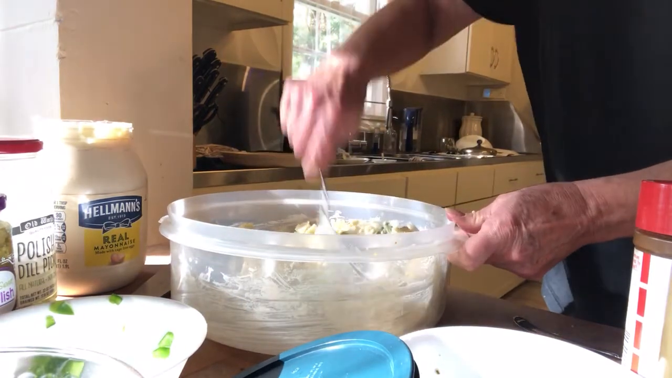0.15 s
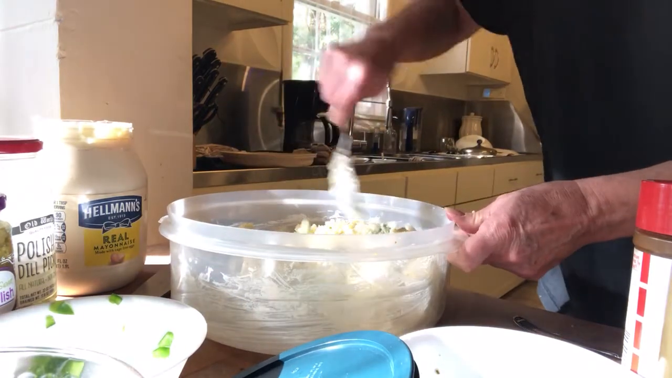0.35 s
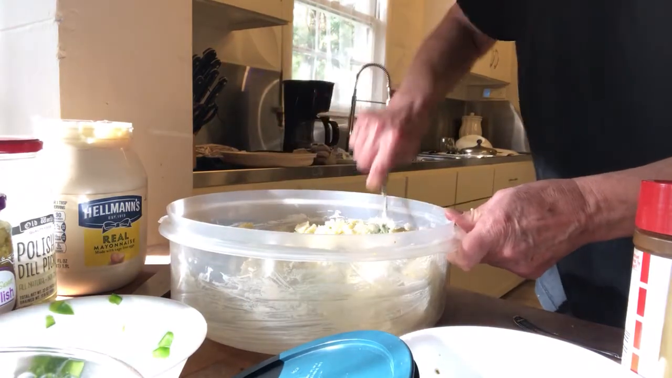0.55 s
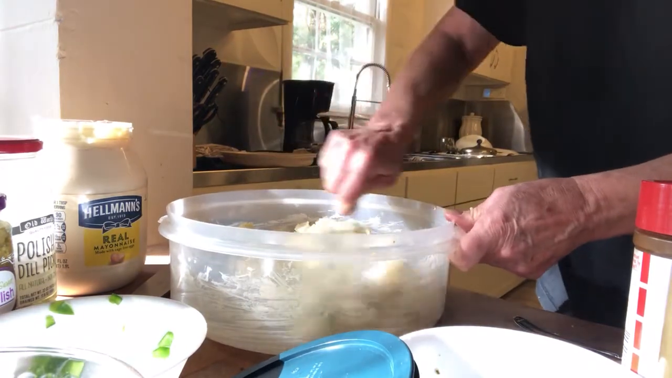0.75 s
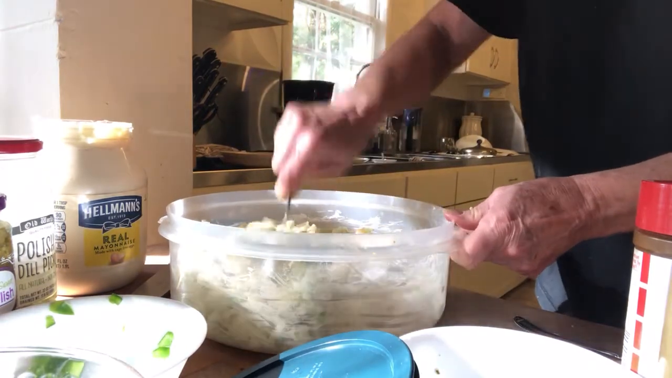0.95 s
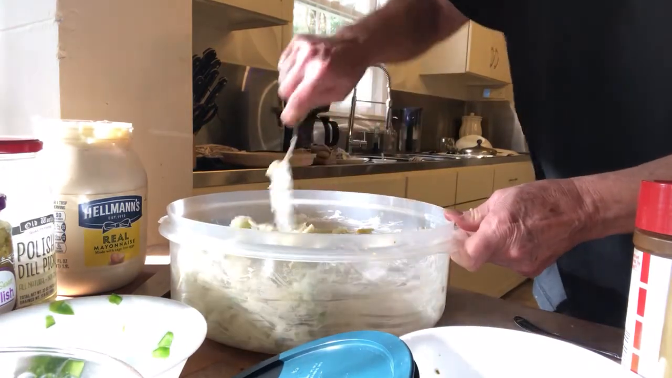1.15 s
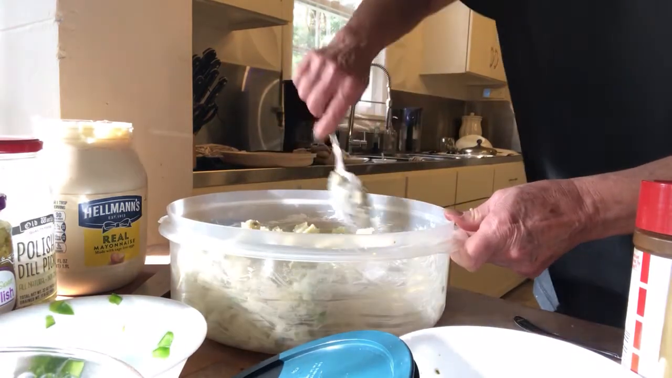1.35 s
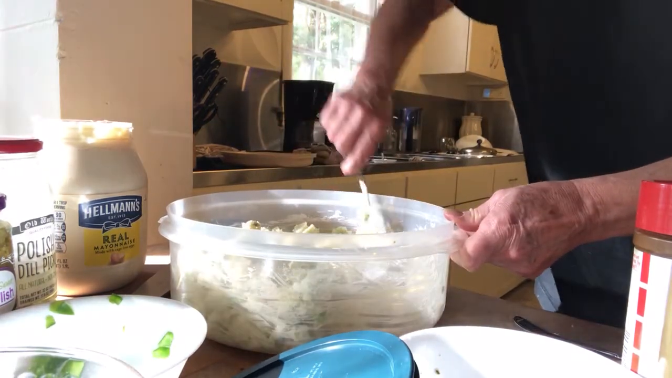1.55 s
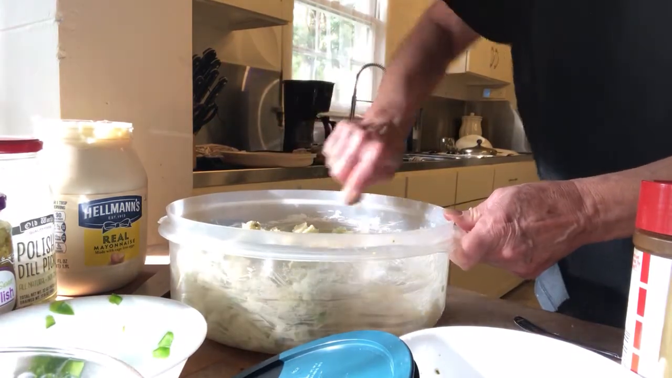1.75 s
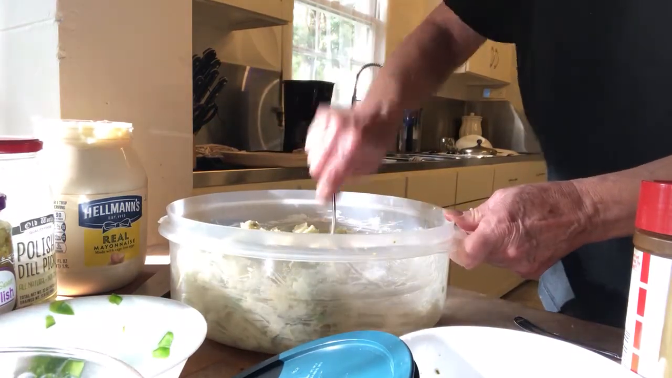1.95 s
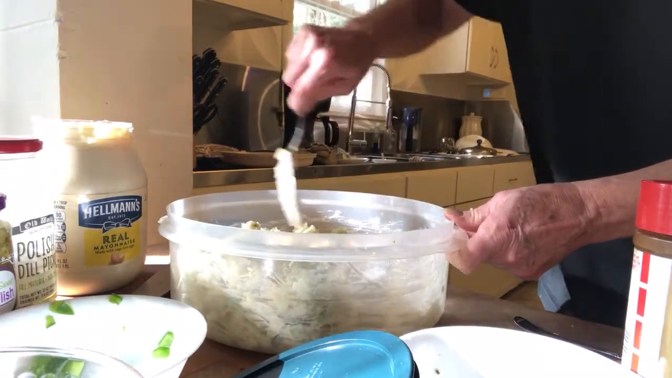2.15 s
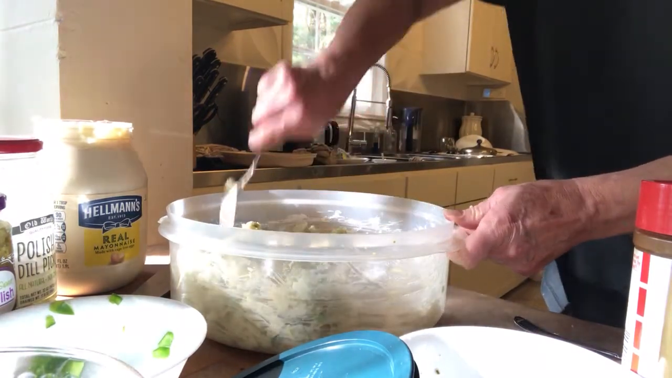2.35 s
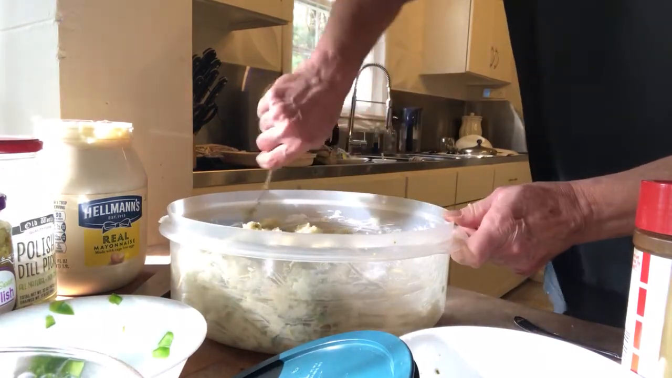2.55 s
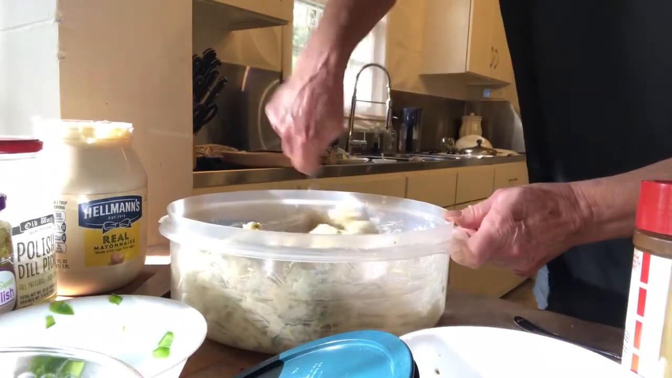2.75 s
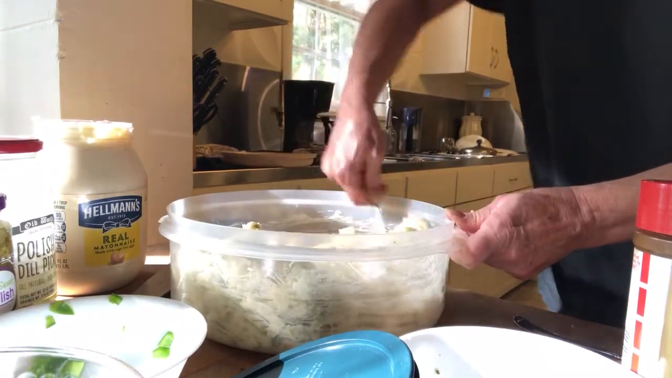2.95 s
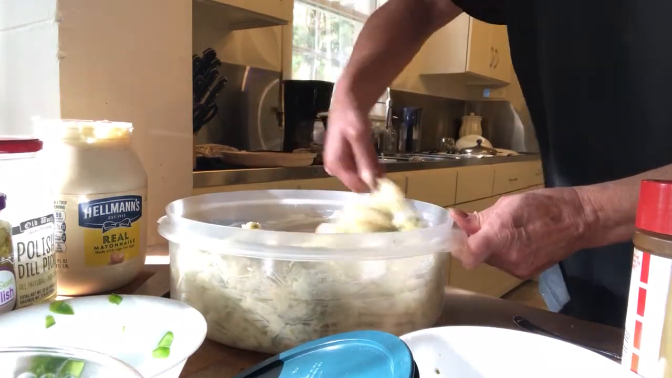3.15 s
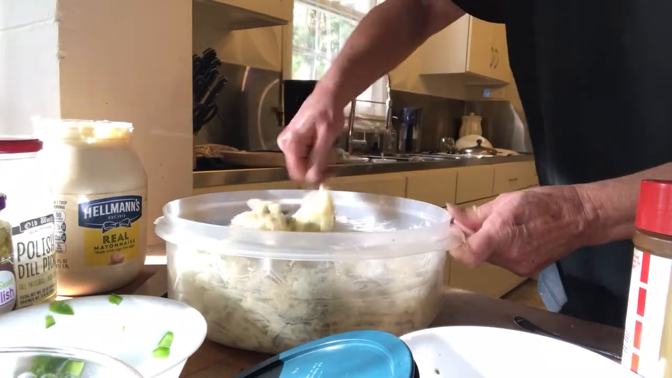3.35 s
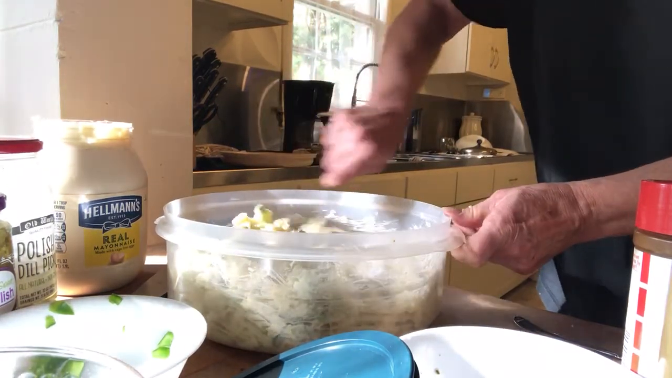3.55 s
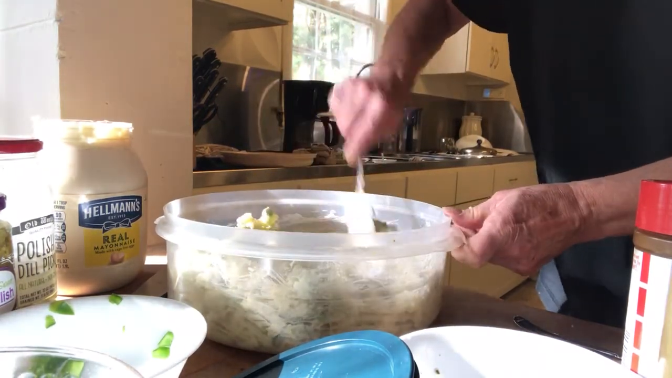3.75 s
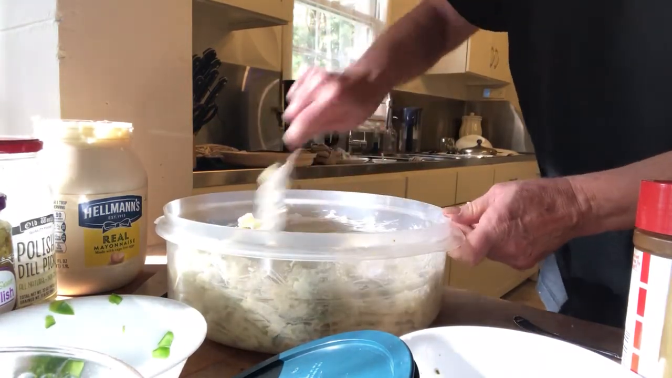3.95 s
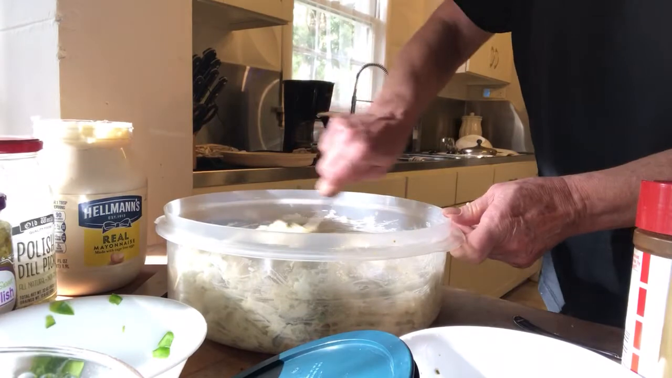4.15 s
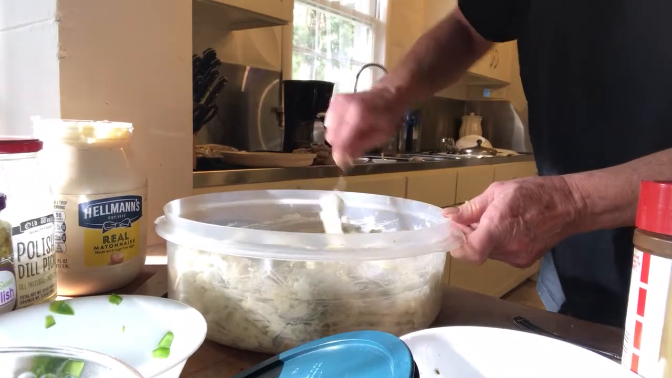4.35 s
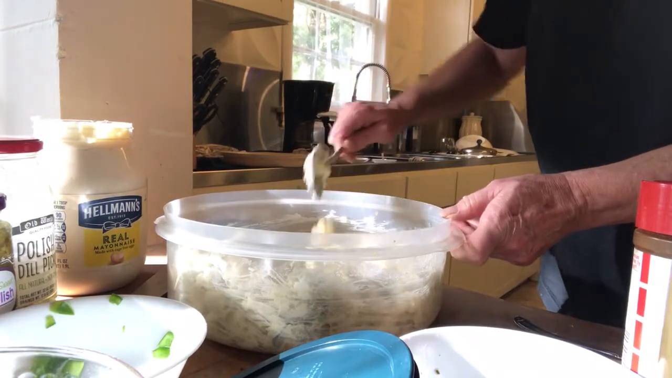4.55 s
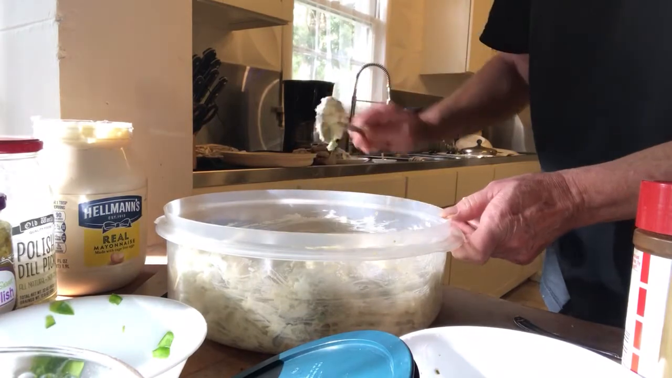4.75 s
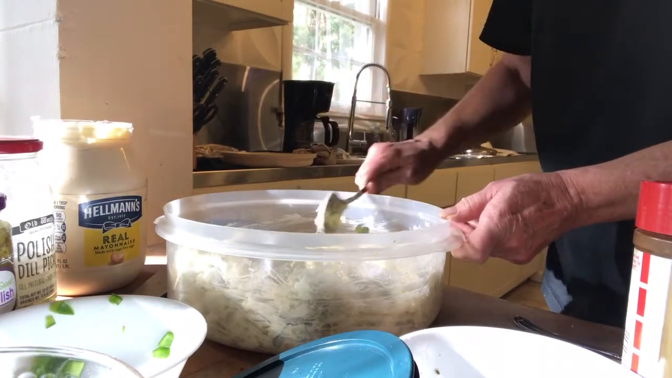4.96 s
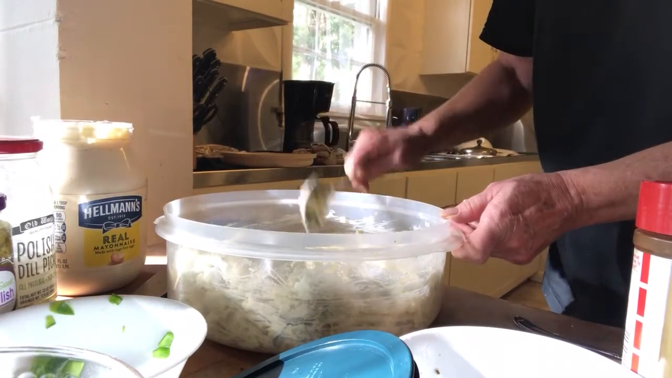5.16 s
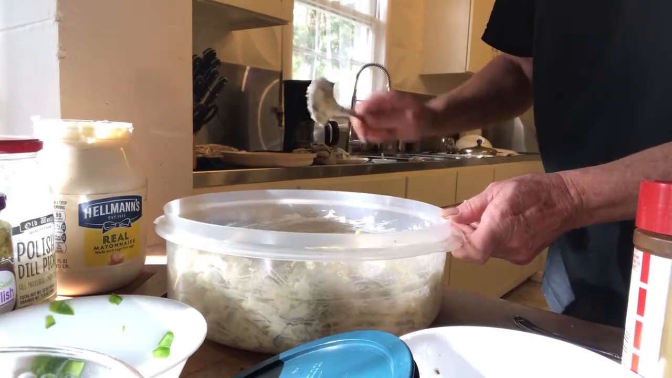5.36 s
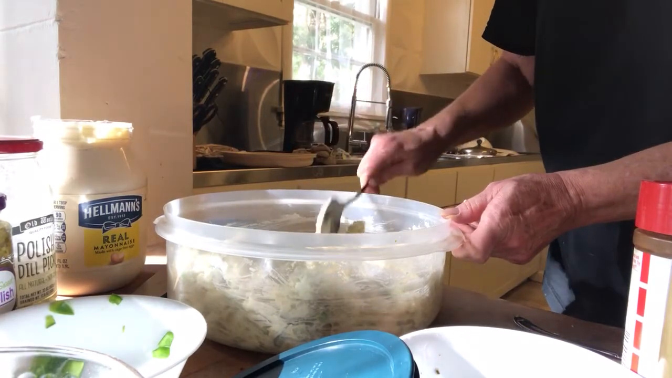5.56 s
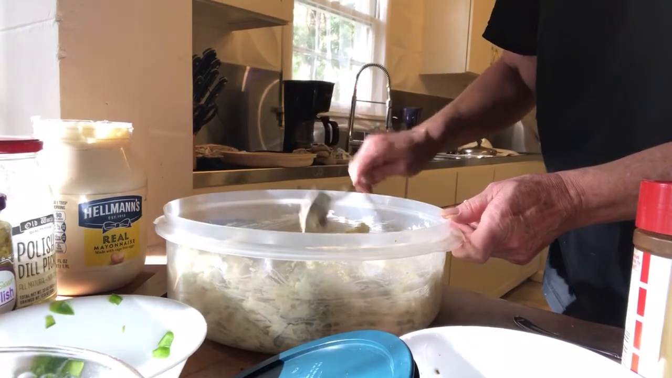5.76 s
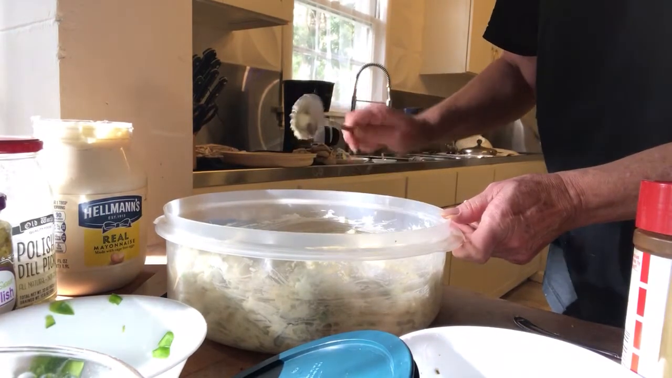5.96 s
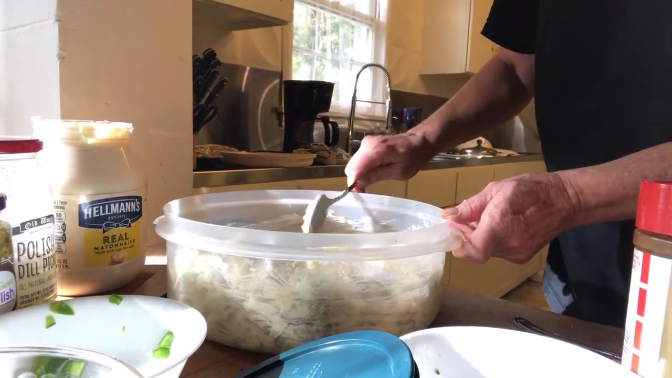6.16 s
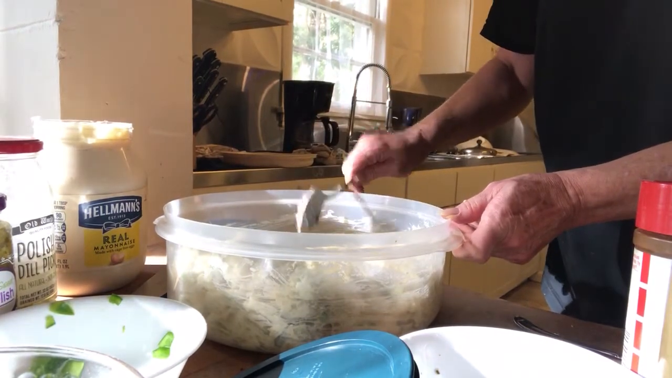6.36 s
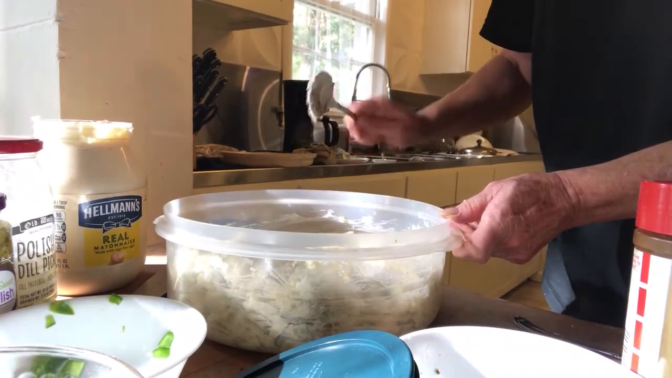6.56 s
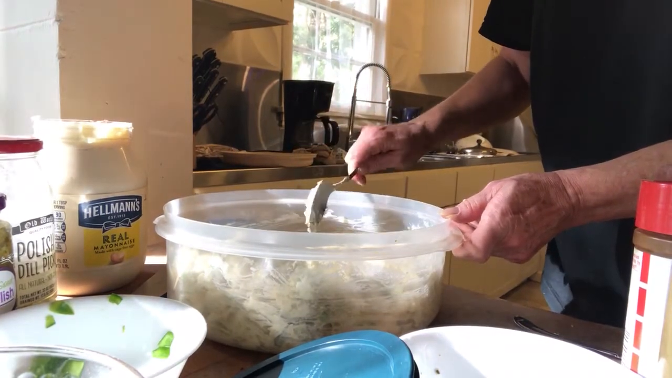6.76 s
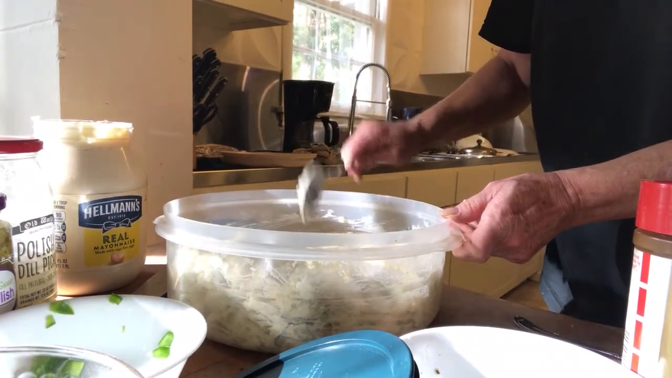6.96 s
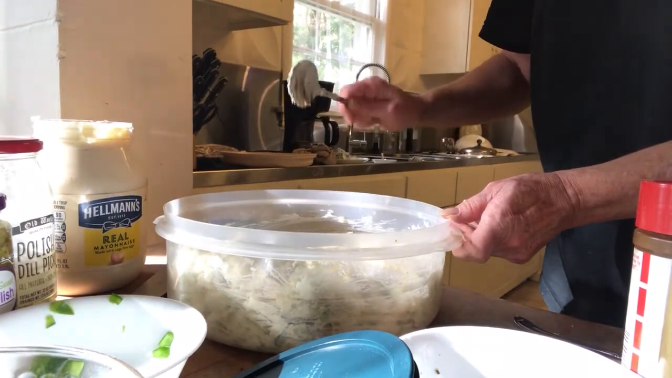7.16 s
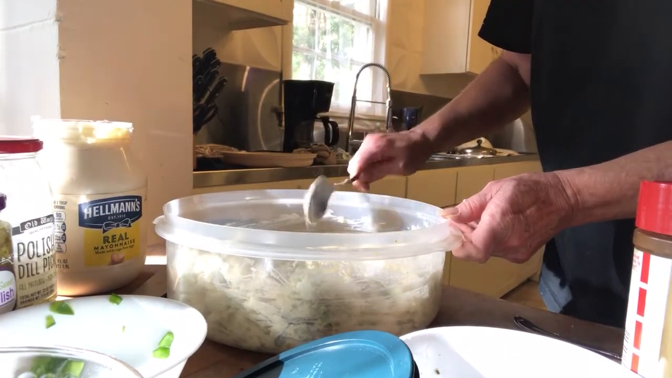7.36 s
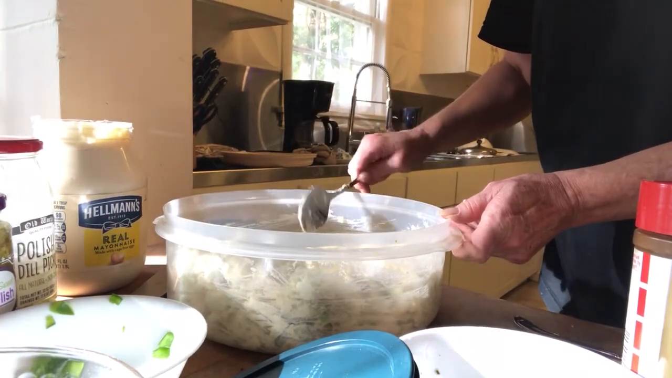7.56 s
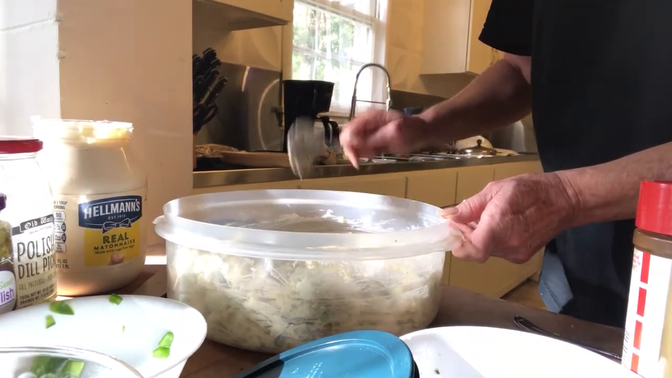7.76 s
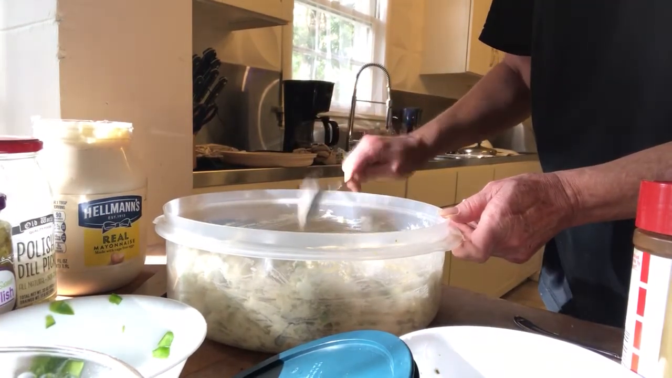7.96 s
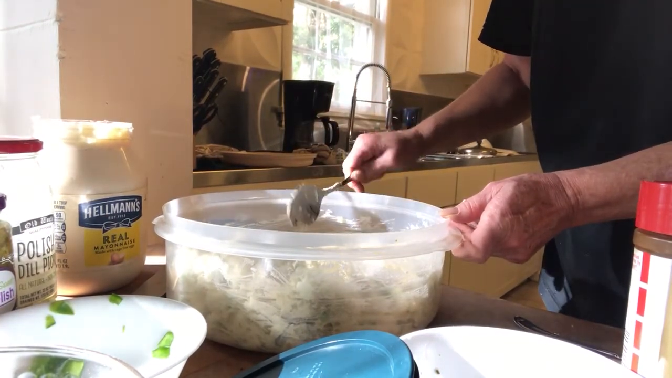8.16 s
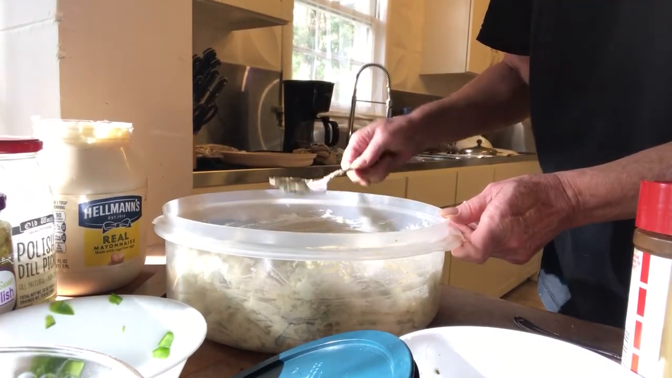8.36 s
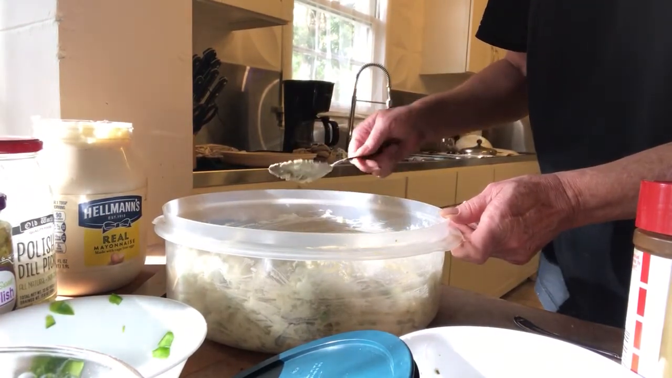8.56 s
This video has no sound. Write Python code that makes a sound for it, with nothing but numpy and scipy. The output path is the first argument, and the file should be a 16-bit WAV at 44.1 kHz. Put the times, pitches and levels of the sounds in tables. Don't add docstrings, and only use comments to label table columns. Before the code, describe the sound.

Close microphone, small reverberant kitchen. First, uneven stirring: soft crackling sauce, dull drags, the bowl rubbing on the counter, and a few sharper clacks of a steel spoon against the plastic through food. Then six hard, hollow plastic knocks on the rim, a little over half a second apart, some followed by quick faint bounces. Quiet fridge hum and room hiss fill the gaps.

```python
import sys
import numpy as np
from scipy import signal
from scipy.fft import rfft, irfft
from scipy.io import wavfile
from scipy.ndimage import uniform_filter1d

SR = 44100
rng = np.random.default_rng(int(sys.argv[2]) if len(sys.argv) > 2 else 0)


def nominal_scale(level):
    x = np.asarray(level, float) / 20
    return 10 ** x


def bounce(signal):
    frames = np.transpose(np.atleast_2d(signal))
    limited = np.clip(frames, -1, 1)
    pcm = np.round(limited * 32767).astype(np.int16)
    wavfile.write(sys.argv[1], SR, pcm)


N = 379127


def rms_one(x):
    return x / np.sqrt(np.mean(x ** 2) + 1e-20)


def at_hz(points, hz):
    point_hz, value = np.array(points)[:, 0], np.array(points)[:, 1]
    return np.interp(np.log(hz), np.log(point_hz), value)


def bins_hz(count):
    return np.maximum(np.fft.rfftfreq(count, 1 / SR), 1)


def filtered(x, order, hz, kind):
    return signal.sosfilt(signal.butter(order, hz, kind, fs=SR, output="sos"), x)


def coloured(x, spectrum):
    (low_hz, low_db), (high_hz, high_db) = spectrum[0], spectrum[-1]
    closed = [(low_hz / 2, low_db - 25)] + list(spectrum) + [(high_hz * 2, high_db - 25)]
    return rms_one(irfft(rfft(x) * nominal_scale(at_hz(closed, bins_hz(len(x)))), len(x)))


def resonance(x, hz, width_hz):
    r = np.exp(-np.pi * width_hz / SR)
    w = 2 * np.pi * hz / SR
    return signal.lfilter([0, np.sin(w)], [1, -2 * r * np.cos(w), r * r], x + 1e-18)


def add(out, piece, s):
    i = round(s * SR)
    out[i:i + len(piece)] += piece[:N - i]


# (time [s], strength [dB], fullness [dB], ring [dB], edge [dB])
KNOCKS = [(4.936, 2, -10.5, -12.5, -31.5), (4.96, -18, -14, -17.5, -22), (5.007, -13.5, -9, -16.5, -43.5),
          (5.045, -26.5, -2.5, -27.5, -32.5), (5.542, 1, -10.5, -13.5, -31.5),
          (5.652, -21.5, -4, -36.5, -47.5), (6.133, 0, -7.5, -14.5, -27.5), (6.211, -16, -7, -14.5, -29),
          (6.748, 0.5, -8.5, -15, -24.5), (7.399, -1.5, -8, -10.5, -23), (7.498, -16.5, -7, -14.5, -35.5),
          (8.037, -1.5, -5.5, -7.5, -23.5), (8.115, -12.5, -8, -7.5, -31), (8.156, -24, -10.5, -3.5, -32)]
# (time [s], strength [dB], fullness [dB],
# ring [dB], edge [dB])
MORE_REBOUNDS = [
    (4.955, -15.5, -13, -16.5, -25.5),
    (5.57, -24, -5.5, -14, -21.5),
    (6.154, -20, -5.5, -23, -16.5),
    (6.26, -27, -10.5, -27, -38.5),
]
RIM_HZ = [730, 1400, 6000]
# (frequency [Hz], level [dB])
RIM_BASS = (130, -12.5)


def rim_knocks():
    return struck_bowl(KNOCKS + MORE_REBOUNDS, RIM_HZ, [RIM_BASS], travel=0.03, damping=0.87,
                       crack_db=-2, room_db=16.0)


# (time [s], strength [dB], thump [dB], fullness [dB], edge [dB])
TAPS = [(0.092, -37.5, -5.5, -9, -8), (0.711, -15, -30, -14.5, -29), (1.281, -65.5, 18, 18.5, -6),
        (1.528, -8.5, -23, -30, -26), (1.876, -17, -62, -33, -20), (2.581, -40.5, 5, -0.5, -19),
        (2.967, -35, -33, -28, -18), (3.467, -45.5, 0, -5, -35), (3.636, -17.5, -22, -17, -48),
        (3.678, -15.5, -17, -16, -46), (3.727, -42, -11, -16, -7), (4.468, -68.5, 17, 16, 5.5)]
TAP_HZ = [320, 730, 1900, 4800]


def chopping_taps():
    ring_db = -10.5
    blows = [(s, strength, thump, fullness, ring_db, edge) for s, strength, thump, fullness, edge in TAPS]
    return struck_bowl(blows, TAP_HZ, [], travel=0.017, damping=1.25, crack_db=2, room_db=12.5)


# (frequency [Hz], width [Hz], level [dB])
BOWL_MODES = [(77.5, 24, -15), (132, 57, -25.5), (185, 61, -18.5), (294.8, 120, 5.5), (340.8, 86, -2),
              (688, 96, -7), (763, 188, 6), (1110, 140, -7.5), (1330, 110, -2.5), (1636, 190, 3.5),
              (2164, 300, 8.5), (2799, 230, 1.5), (3433, 280, -3.5), (4530, 420, -3), (5620, 220, -7.5),
              (6560, 170, -8), (7900, 1100, -8.5), (8800, 1800, -13), (11800, 1200, -6),
              (14100, 1500, -9.5)]
# (frequency [Hz], level [dB])
AROUND = [(50, -26.5), (80, -1.5), (150, 10), (300, 27.5), (530, 8.5), (750, 17.5), (1100, 12), (1400, 18),
          (2200, 13), (3300, 7.5), (4500, 7), (5800, 13), (9000, 6), (15000, 3.5)]


def struck_bowl(blows, part_hz, base, travel, damping, crack_db, room_db):
    near, spread, t = np.zeros(N), np.zeros(N), np.arange(4096) / SR
    hz, width_hz, mode_db = np.transpose(BOWL_MODES)[:, :, None]
    chance = rng.standard_normal((len(blows), 2, len(BOWL_MODES)))
    grit = filtered(rng.standard_normal((len(blows), len(t))), 1, [4000, 14000], "band")
    since = np.maximum(t - travel / np.sqrt(hz), 0)
    swell = (1 - np.exp(-since * hz * 0.59)) * np.exp(-np.pi * damping * width_hz * since)
    grit_swell = np.maximum(t - 0.0006, 0) / 0.0011
    bins = bins_hz(len(t))
    for (s, peak_db, *parts_db), (strength, detune), noise in zip(blows, chance, grit):
        colour = base + list(zip(part_hz, parts_db))
        gain = nominal_scale(8 + peak_db + at_hz(colour, hz) + spot_db(s, hz) + mode_db + strength[:, None])
        pitch = bent_hz(s, hz) * (1 + 0.01 * detune[:, None])
        rings = gain * swell * np.sin(2 * np.pi * pitch * since)
        crack = nominal_scale(2.0 * peak_db + parts_db[-1] + crack_db) * noise * grit_swell * np.exp(1 - grit_swell)
        add(near, rings.sum(axis=0) + crack, s - 0.0004)
        click_db = peak_db + room_db + at_hz(colour, bins) + 0.54 * spot_db(s, bins) + at_hz(AROUND, bins)
        add(spread, np.roll(irfft(nominal_scale(click_db)), 200), s - 200 / SR)
    return filtered(near, 3, 66, "high"), spread


SPOT_LASTS_S = 0.33
# (from time [s], mode [Hz], level [dB])
SPOTS = [(.7, 670, 5), (.7, 1650, -1.5), (1.5, 1420, 6), (1.5, 2200, -2), (1.5, 3080, 2), (3.6, 765, 2.5),
         (4.9, 1026, 8), (4.9, 1630, 0.5), (5.5, 1610, -3.5), (5.5, 1330, -9), (6.1, 1050, 2.5),
         (6.1, 1660, -0.5), (6.7, 1750, -2.5), (6.7, 2600, 11.5), (6.7, 1050, 6.5), (7.35, 835, -13),
         (7.35, 1000, -13), (7.35, 1670, -6.5), (7.35, 2706, 7.5), (8.0, 670, -7), (8.0, 970, 5.5),
         (8.0, 2680, -3.5), (.7, 1110, 7), (.7, 2800, 6.5), (.7, 2150, -4.5), (1.5, 600, -18),
         (7.35, 1110, -2.5), (8.0, 1110, -4), (3.6, 724, -3.5), (.7, 790, -3.5), (1.5, 200, -8),
         (8.1, 2750, 2), (1.5, 1100, -5), (6.1, 527, -10), (1.5, 3500, 4), (3.6, 1420, 5), (3.6, 500, 13),
         (3.67, 1660, -9), (3.67, 720, 0), (3.67, 2900, 12), (1.5, 300, 0.5), (6.7, 540, -12.5),
         (7.35, 5440, 7), (4.9, 760, -0.5), (4.9, 3350, 5.5), (4.9, 6350, -4), (5.5, 1100, 4),
         (5.5, 3070, 4), (6.1, 1330, 0.5), (6.1, 5480, -2.5), (7.35, 703, 2.5), (7.35, 6520, -5.5),
         (7.35, 4700, -5), (8.0, 303, -3.5), (8.0, 6500, -9), (8.0, 3400, -3.5), (8.0, 5500, 5.5),
         (8.0, 1970, 0)]


def spot_db(s, hz):
    breadth_octaves = 0.18
    return sum(db * np.exp(-(np.log2(hz / mode_hz) / breadth_octaves) ** 2)
               for start, mode_hz, db in SPOTS if 0 <= s - start < SPOT_LASTS_S)


# (from time [s], mode [Hz], bent mode [Hz])
BENDS = [(.7, 763, 635), (.7, 689, 600), (.7, 3433, 3050), (1.5, 1330, 1490), (1.5, 2799, 2560),
         (3.6, 1330, 1423), (3.6, 2799, 2500), (4.9, 1330, 1390), (4.9, 2799, 2900), (5.5, 763, 755),
         (6.1, 1330, 1242), (6.1, 1636, 1540), (6.7, 763, 740), (6.7, 2799, 2570), (6.7, 4530, 4360),
         (7.35, 763, 732), (7.35, 2799, 2550), (7.35, 2164, 2210), (8.0, 763, 831), (8.0, 1330, 1390),
         (8.0, 2164, 2040)]


def bent_hz(s, hz):
    ratios = [np.ones_like(hz)]
    for start, mode_hz, new_hz in BENDS:
        if 0 <= s - start < SPOT_LASTS_S:
            ratios.append(np.where(np.abs(hz / mode_hz - 1) < 0.04, new_hz / hz, 1))
    return hz * np.prod(ratios, axis=0)


# (time [s], peak level [dB], centre [Hz], length [s])
SCUFFS = [(0.091, -41, 1760, 0.0098), (0.625, -45.5, 6400, 0.004), (0.652, -54, 2510, 0.008),
          (0.713, -22.5, 593, 0.0044), (0.842, -46, 1390, 0.0059), (0.862, -27.5, 1500, 0.0035),
          (0.886, -40, 634, 0.013), (0.891, -35, 3000, 0.0097), (1, -45, 1410, 0.0083),
          (1.664, -38.5, 490, 0.0049), (1.791, -40.5, 2900, 0.0066), (1.856, -47, 3000, 0.0043),
          (1.865, -36, 1390, 0.0068), (1.876, -22.5, 3960, 0.0091), (2.388, -50.5, 1050, 0.0076),
          (2.507, -41.5, 1680, 0.0083), (2.517, -35, 1670, 0.0056), (2.521, -37, 1630, 0.005),
          (2.641, -47, 1700, 0.026), (2.664, -47, 1560, 0.012), (2.785, -52, 1500, 0.05),
          (2.928, -40, 2720, 0.0041), (3.022, -43, 606, 0.0045), (3.62, -66, 1430, 0.0073),
          (3.707, -37, 1120, 0.017), (4.245, -40.5, 2480, 0.0072), (4.525, -55.5, 2200, 0.0064),
          (4.73, -66, 2230, 0.0063), (7.16, -49, 960, 0.0068), (0.951, -47, 2500, .004),
          (0.979, -46, 3000, 0.0044), (2.773, -53, 1500, .006), (2.992, -46, 886, 0.007),
          (2.993, -43.5, 3000, .005), (4.181, -51, 2150, .006), (4.228, -54, 2330, .005),
          (4.282, -53, 1597, .005), (1.57, -43, 1600, 0.007), (3.728, -43, 1400, 0.011),
          (2.533, -43, 350, .006)]


def scuffs():
    out, far, t = np.zeros(N), np.zeros(N), np.arange(3000) / SR
    for (s, peak_db, hz, length), noise in zip(SCUFFS, rng.standard_normal((len(SCUFFS), len(t)))):
        length = max(length, 0.001)
        grit = rms_one(resonance(noise, hz, 0.34 * hz)) + 0.063 * noise
        grit = filtered(grit, 2, hz / 2, "high")
        envelope = np.minimum(t / 0.00051, 1) * np.exp(-t / length)
        add(out, nominal_scale(peak_db - 6.0) * grit * envelope, s - 0.001)
        click = rms_one(resonance(t == 0, hz, 0.5 * hz))
        add(far, nominal_scale(peak_db - 7.5) * click * np.sqrt(length / 2 / t[-1]), s)
    return np.array([out, far])


# (time [s], peak level [dB], centre [Hz])
SMACKS = [(0.093, -53, 4100), (0.5776, -49, 5800), (0.7098, -20, 3270), (0.84, -35, 3700),
          (0.8565, -28, 3450), (0.8899, -50, 3920), (1.0001, -44, 4950), (1.5279, -17.5, 3930),
          (1.6242, -43, 4110), (1.7225, -42, 6260), (1.7524, -44, 3700), (1.8512, -42, 4170),
          (1.864, -29, 4600), (2.2169, -47.5, 5300), (2.5127, -34, 3750), (2.664, -42, 4930),
          (2.7766, -50, 3800), (2.832, -43, 5120), (2.9296, -39.5, 5830), (2.9692, -33, 3370),
          (3.1215, -46, 6560), (3.2874, -47, 7340), (3.4121, -47.5, 6300), (3.4496, -47, 6950),
          (3.5359, -45.5, 3900), (3.6341, -24, 3120), (3.679, -24.5, 3650), (3.7514, -44, 5400),
          (4.2535, -45, 6730), (4.5605, -50, 5600), (4.5716, -47, 5000), (4.4843, -55, 5500),
          (4.4755, -55, 6100), (4.3741, -49, 5600), (4.325, -50, 6000), (4.1561, -51, 5000),
          (4.181, -55, 6200), (2.597, -46, 4200), (2.628, -45, 4000), (2.698, -46, 4400),
          (0.8935, -42, 5500), (0.7245, -38, 2800)]
# (time [s], peak level [dB], centre [Hz])
SNAPS = [(0.082, -43, 8800), (0.1965, -44, 9060), (0.647, -43, 12200), (0.7106, -41, 11500),
         (0.8594, -41, 13300), (1.5294, -30, 14600), (1.6242, -46, 9100), (1.722, -43, 12800),
         (1.863, -45, 8800), (1.8736, -35, 9080), (2.217, -50, 9860), (2.513, -47, 10200),
         (2.8414, -44, 12500), (2.927, -38, 12800), (2.97, -47, 9030), (3.341, -44.5, 10200),
         (3.4425, -49, 11000), (3.494, -39, 13400), (3.6083, -41.5, 11300), (3.8102, -48, 11400),
         (4.0836, -45, 15000), (4.1443, -48, 12600), (4.2358, -45, 14500), (4.558, -56, 9840),
         (4.311, -49, 9000), (4.5716, -57, 9000), (1.685, -48, 7500)]


def wet_films():
    broad = pops(SMACKS, length=0.0011, breadth=0.55)
    fine = pops(SNAPS + flecks(count=110), length=0.00071, breadth=0.27)
    return broad + fine


# (time [s], peak level [dB], pitch [Hz])
PINGS = [
    (0.6044, -58, 2510),
    (1.0001, -44.5, 5000),
    (1.6844, -54, 1510),
    (2.2169, -53, 5300),
    (2.8344, -53, 5050),
    (2.859, -65, 2500),
    (4.5236, -55, 2210),
    (4.7277, -60, 2200),
    (7.1596, -55.5, 2175),
]


def spoon_pings():
    return pops(PINGS, length=0.0022, breadth=0.04)


def pops(events, length, breadth):
    out, far, t = np.zeros(N), np.zeros(N), np.arange(600) / SR
    for (s, peak_db, hz), noise in zip(events, rng.standard_normal((len(events), len(t)))):
        pop = resonance(noise * t * np.exp(-t / length), hz, breadth * hz)
        pop = pop / np.abs(pop).max()
        add(out, nominal_scale(peak_db - 2.0) * pop, s)
        click = rms_one(resonance(t == 0, hz, 0.5 * hz))
        add(far, nominal_scale(peak_db - 2.5) * click * np.std(pop), s)
    return np.array([out, far])


STIR_END_S = 4.8


def flecks(count):
    over_wet_db, spread_db = 18, 4
    when, size, pitch = rng.random((count, 3)).T
    s = when * STIR_END_S
    wet_db = passes_db(column=3)[(s * SR).astype(int)]
    return list(zip(s, wet_db + over_wet_db + spread_db * (2 * size - 1), 3500 * 4 ** pitch))


# (frequency [Hz], level [dB per Hz])
RUB = [(250, 4.5), (380, -0.5), (500, -0.5), (750, -3)]
# (frequency [Hz], level [dB per Hz])
DRAG = [(600, -2), (800, -18), (900, -0.5), (1050, -6.5), (1400, -1.5), (1620, 1), (1900, -4), (2600, 3),
        (4000, -3.5), (7000, -7)]
# (frequency [Hz], level [dB per Hz])
WET = [(3000, -6), (5000, -1.5), (7000, 2), (9000, -7.5), (10500, 0.5), (12500, -2.5), (15500, -1)]


def stirring():
    rub_idle_db, rub_under_drag_db = -76.5, -14
    drag, wet = nominal_scale(passes_db(column=2)), nominal_scale(passes_db(column=3))
    rub = nominal_scale(rub_idle_db) * (np.arange(N) / SR < STIR_END_S) + nominal_scale(rub_under_drag_db) * drag
    grit = grainy(900, spread_db=3.5, smooth=1.1, low_hz=700, high_hz=6000, cycles=3.5)
    crackle = grainy(900, spread_db=3.5, smooth=1.0, low_hz=3936, high_hz=14300, cycles=5.0)
    rubbing = rub * coloured(rng.standard_normal(N), RUB)
    return rubbing + drag * coloured(grit, DRAG) + wet * coloured(crackle, WET)


def grainy(per_s, spread_db, smooth, low_hz, high_hz, cycles):
    sizes = nominal_scale(spread_db * np.minimum(rng.exponential(1, N), 4)) * rng.choice([-1, 1], N)
    clumps = rms_one(resonance(rng.standard_normal(N), 11.0, 25))
    born = sizes * (rng.random(N) < per_s * nominal_scale(5 * clumps) / SR)
    dealt = rng.integers(0, 12, N)
    pitches = np.geomspace(low_hz, high_hz, 12)
    grains = sum(resonance(born * (dealt == k), hz, hz / cycles) for k, hz in enumerate(pitches))
    return rms_one(grains) + smooth * rng.standard_normal(N)


# (start time [s], hold [s], drag level [dB], wet crackle level [dB])
PASSES = [(0.0, 0.012, -52.5, -58.5), (0.2, 0.11, -73.5, -80), (0.576, 0.13, -70, -73.5),
          (0.728, .07, -55.5, -65), (0.84, .13, -58.5, -65), (1.124, 0.078, -71.5, -78),
          (1.59, 0.073, -60, -66), (1.67, 0.24, -60, -64), (2.056, 0.55, -74.5, -89),
          (2.5, 0.092, -63.5, -69.5), (2.64, 0.13, -60, -69), (2.816, 0.19, -62.5, -64.5),
          (3.104, 0.18, -68.5, -70), (3.397, 0.14, -73, -70.5), (3.664, 0.011, -49.5, -62.5),
          (4.052, 0.13, -72.5, -71.5), (4.187, 0.11, -63, -69), (4.36, 0.15, -78, -78)]


def passes_db(column):
    dig_in_db_per_s, let_go_db_per_s = 311, 114.5
    t = np.arange(0, N, 64) / SR
    shapes = []
    for row in PASSES:
        start, hold = row[:2]
        before, after = np.maximum(start - t, 0), np.maximum(t - start - hold, 0)
        shapes.append(row[column] - dig_in_db_per_s * before - let_go_db_per_s * after)
    return np.interp(np.arange(N) / SR, t, np.max(shapes, axis=0))


# (start time [s], end time [s], pitch [Hz], width [Hz], level [dB])
STROKES = [
    (2.50, 2.70, 1600, 110, -63.5),
    (2.7, 2.87, 830, 51, -69),
    (1.63, 1.75, 980, 160, -59),
    (3.64, 3.8, 1130, 170, -55),
    (2.2, 3.4, 900, 84, -73),
    (1.62, 1.75, 550, 270, -60),
    (3.78, 4.28, 420, 45, -66.5),
]


def strokes():
    t = np.arange(N) / SR
    white = rng.standard_normal(N)
    out = np.zeros(N)
    for start, end, hz, width_hz, db in STROKES:
        swell = np.sin(np.pi * np.clip((t - start) / (end - start), 0, 1)) ** 0.5
        out += nominal_scale(db) * swell * rms_one(resonance(white, hz, width_hz))
    return out


# (frequency [Hz], time [s])
ECHO_FALL_TIME = [(80, 0.41), (300, 0.41), (800, 0.52), (2000, 0.47), (5000, 0.44), (12000, 0.2)]
# (frequency [Hz], level [dB])
ECHO_COLOUR = [(80, 8), (300, -6), (800, -1), (2000, -2), (5000, 0), (12000, -3.5)]
# (delay [s], level [dB])
WALLS = [
    (.0195, -33),
    (.027, -31),
]


def kitchen(x, tail_db):
    far_rooms_db, far_rooms_stretch = -13.5, 2.09
    t = np.arange(int(0.7 * SR)) / SR
    edges = 50 * 2 ** np.arange(0, 8.6, 0.5)
    white = rng.standard_normal((2, len(t)))
    tail = np.zeros(len(t))
    for k, (low, high) in enumerate(zip(edges, edges[1:])):
        hz = np.sqrt(low * high)
        band = filtered(white[k % 2], 2, [low, high], "band")
        lumps_db = 2 * rms_one(resonance(rng.standard_normal(len(t)), 35, 60))
        fall_db = 70 * t / at_hz(ECHO_FALL_TIME, hz)
        dying = nominal_scale(-fall_db) + nominal_scale(far_rooms_db - fall_db / far_rooms_stretch)
        tail += nominal_scale(lumps_db + at_hz(ECHO_COLOUR, hz)) * dying * band
    tail *= nominal_scale(tail_db) * np.clip((t - 0.003) / 0.0018, 0, 1)
    for delay, wall_db in WALLS:
        tail[round(delay * SR)] += nominal_scale(wall_db)
    return signal.fftconvolve(x, tail)[:N]


# (pitch [Hz], width [Hz], level [dB])
FRIDGE = [
    (47, 19, -81),
    (117, 9.2, -72),
    (239, 9.1, -70),
    (2220, 86, -82),
    (3470, 230, -91.5),
    (4360, 120, -92.5),
]


def fridge():
    return sum(nominal_scale(db) * rms_one(resonance(rng.standard_normal(N), hz, width_hz)) for hz, width_hz, db in FRIDGE)


# (frequency [Hz], level [dB per Hz])
QUIET = [(15, -34), (25, -5), (53, -1), (85, -13.5), (124, -8), (163, -10), (238, -11.5), (330, -11),
         (496, -18), (878, -22), (1010, -20), (1930, -29), (2460, -27), (14400, -37.5), (16500, -50)]
# (frequency [Hz], level [dB])
HISS_LIFT = [(200, 2), (600, 5.5), (2000, 8.5), (5000, 9.5), (15000, 7.5)]


def room_hiss():
    quiet_db, hold_s, hard_db = -65.5, 0.408, -7
    tone = nominal_scale(quiet_db) * coloured(rng.standard_normal(N), QUIET)
    lifted = irfft(rfft(tone) * nominal_scale(at_hz(HISS_LIFT, bins_hz(N))), N)
    opened = np.zeros(N)
    for s, peak_db, *_ in KNOCKS:
        opened[round(s * SR):round((s + hold_s) * SR)] += peak_db > hard_db
    opened = uniform_filter1d(np.minimum(opened, 1), size=500)
    return tone + opened * (lifted - tone)


def scene():
    knocks, knocks_far = rim_knocks()
    taps, taps_far = chopping_taps()
    scrapes, scrapes_far = scuffs()
    films, films_far = wet_films()
    pings, pings_far = spoon_pings()
    taps_edge = np.diff(taps_far, prepend=0)
    into_room = knocks_far + taps_far + nominal_scale(-5.0) * taps_edge
    into_room += nominal_scale(-3.5) * scrapes_far + nominal_scale(-2.0) * (films_far + pings_far)
    spoon = knocks + taps + scrapes + films + pings + stirring() + strokes()
    return (spoon + kitchen(into_room, tail_db=-37.0) + fridge() + room_hiss())[None]


def low_pass(x):
    return signal.sosfilt(signal.butter(12, 16860, fs=SR, output="sos"), x)


# (lead time [s], level [dB])
SMEAR = [
    (.0232, -41),
    (.0116, -42),
]


def record(dry):
    notch_hz, rumble_cut_hz, top_hz = 10500, 39, 16900
    heard = dry - 0.44 * signal.lfilter(*signal.iirpeak(notch_hz, 8.0, fs=SR), dry)
    heard = filtered(heard, 4, rumble_cut_hz, "high")
    dull = filtered(heard, 2, 3000, "low")
    ahead = sum(nominal_scale(db) * np.roll(dull, -round(lead * SR), axis=1) for lead, db in SMEAR)
    rounded = 0.78 * np.tanh((heard + ahead) / 0.88)
    mix = signal.sosfilt(signal.cheby2(12, 70, top_hz, fs=SR, output="sos"), rounded)
    return low_pass(mix)


dry = scene()
out = record(dry)
bounce(out)
```